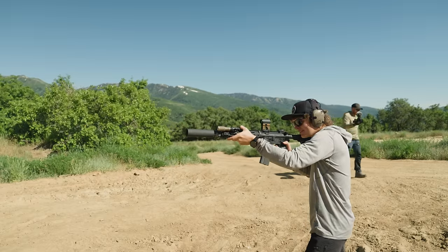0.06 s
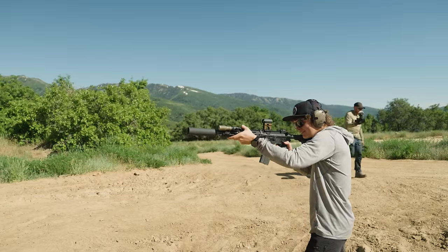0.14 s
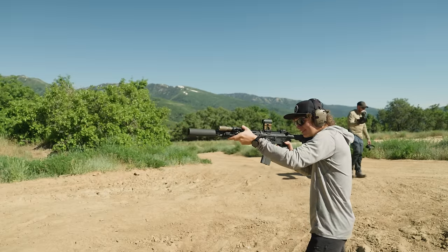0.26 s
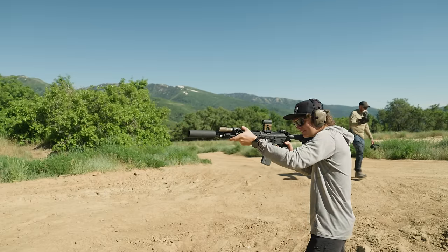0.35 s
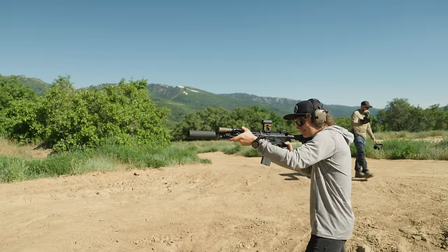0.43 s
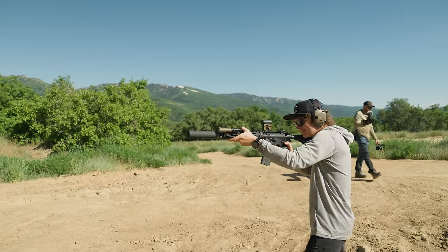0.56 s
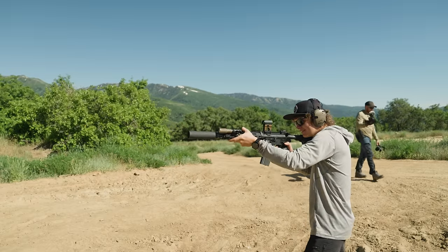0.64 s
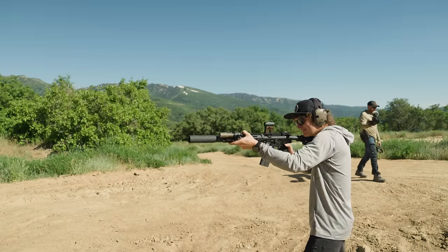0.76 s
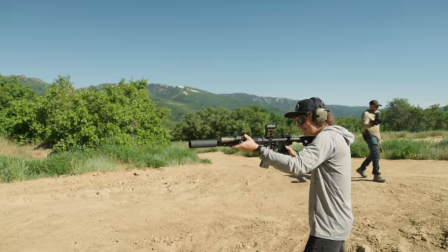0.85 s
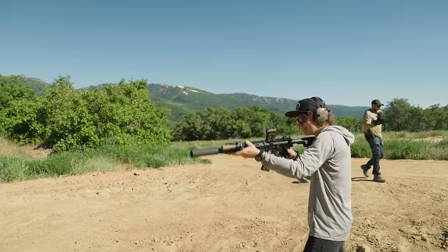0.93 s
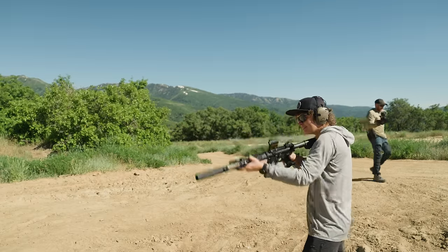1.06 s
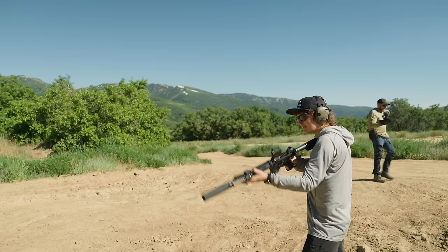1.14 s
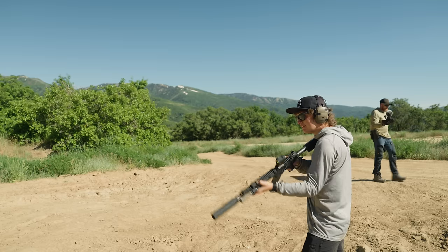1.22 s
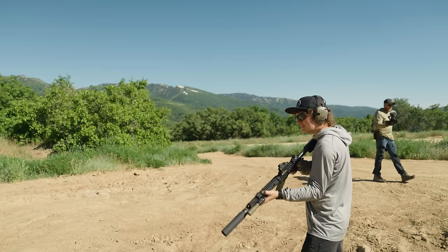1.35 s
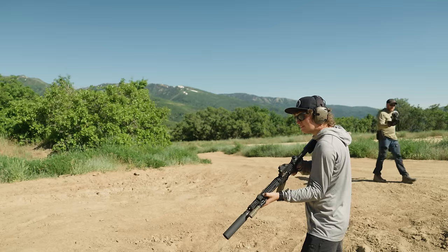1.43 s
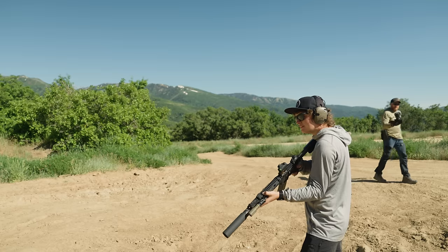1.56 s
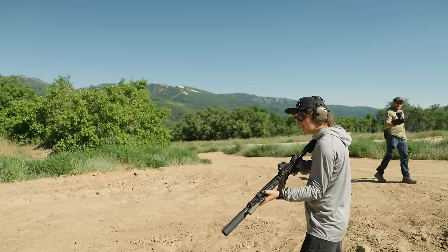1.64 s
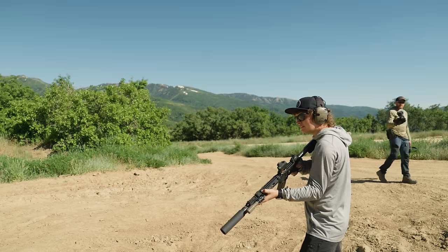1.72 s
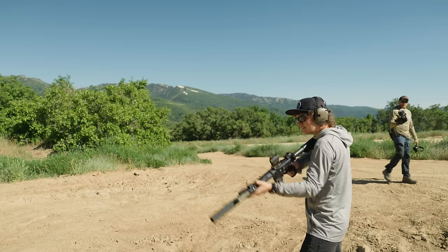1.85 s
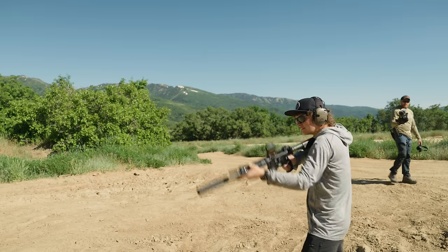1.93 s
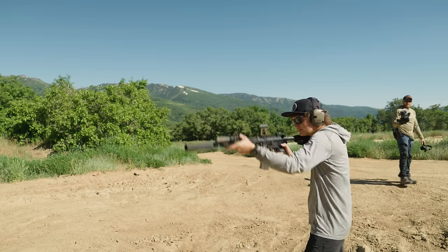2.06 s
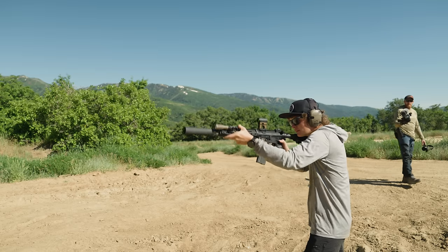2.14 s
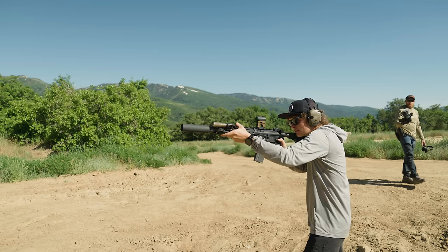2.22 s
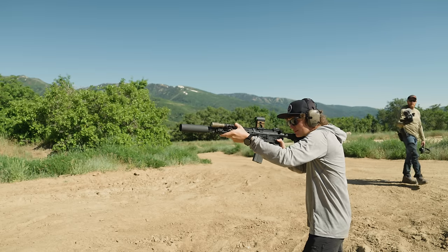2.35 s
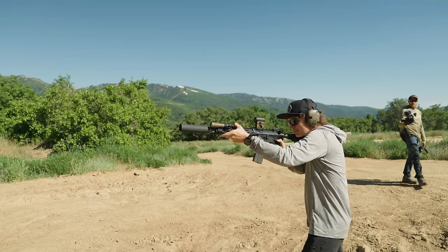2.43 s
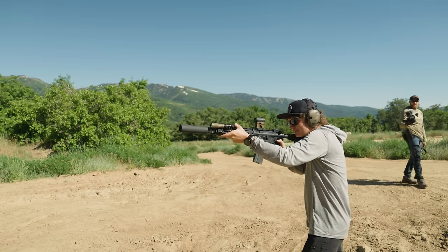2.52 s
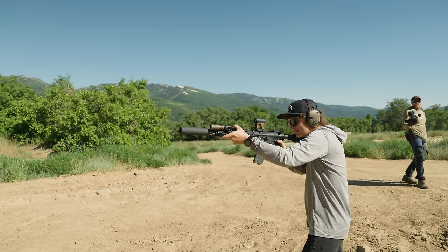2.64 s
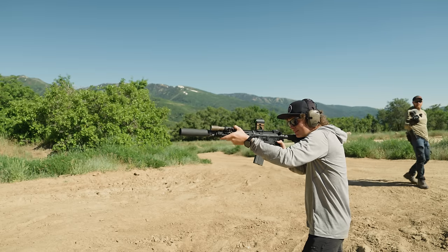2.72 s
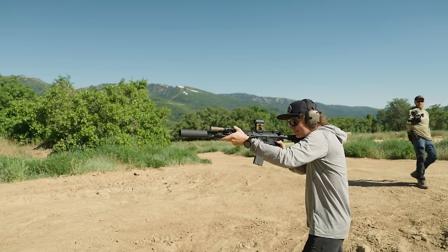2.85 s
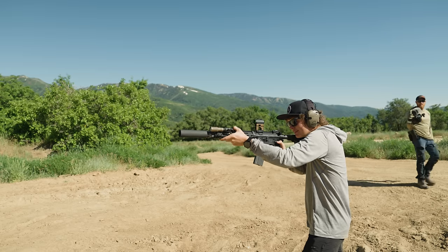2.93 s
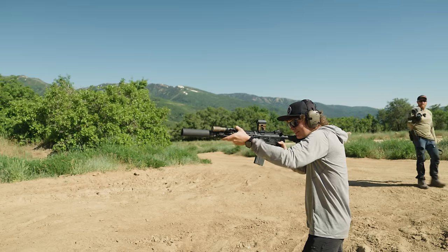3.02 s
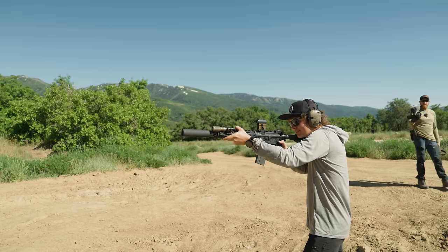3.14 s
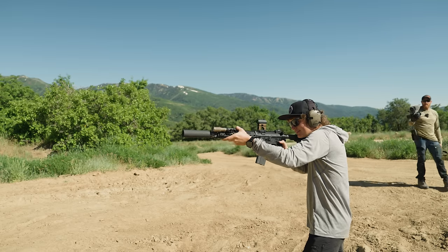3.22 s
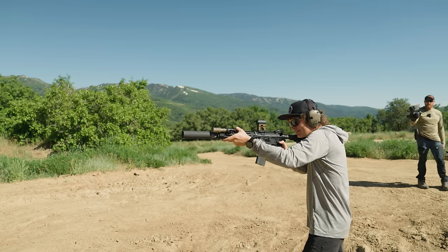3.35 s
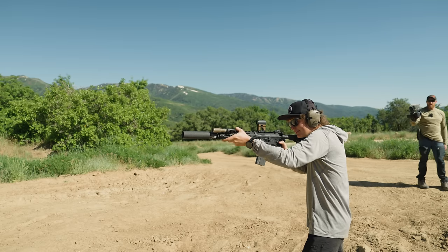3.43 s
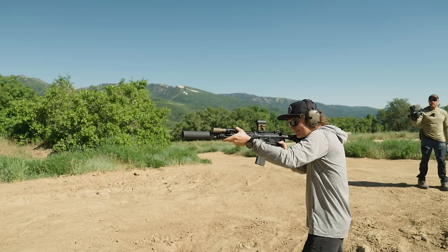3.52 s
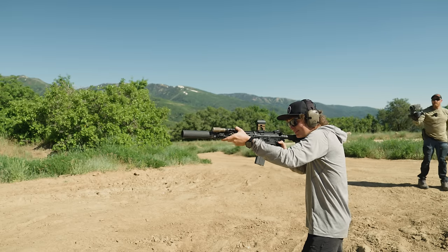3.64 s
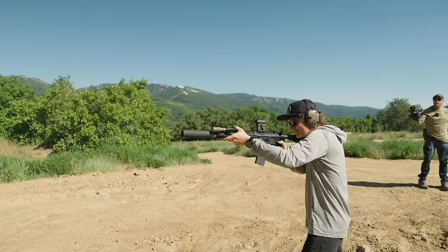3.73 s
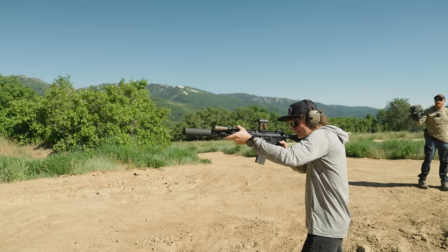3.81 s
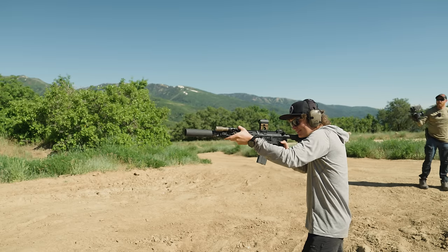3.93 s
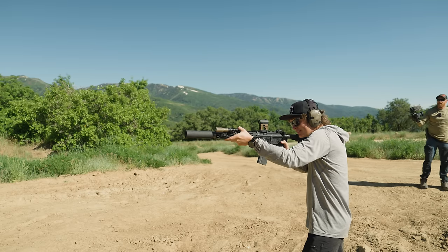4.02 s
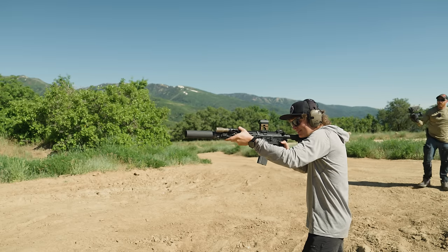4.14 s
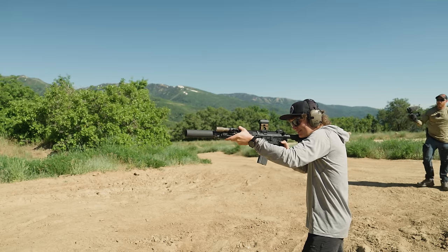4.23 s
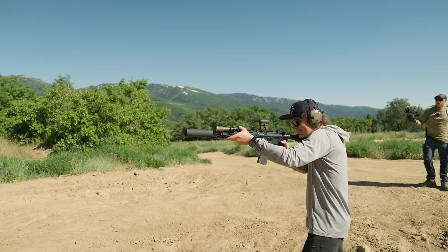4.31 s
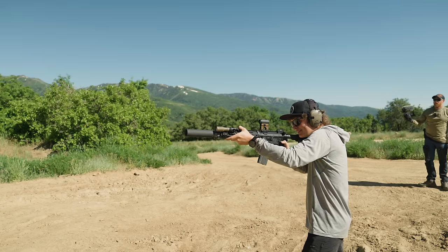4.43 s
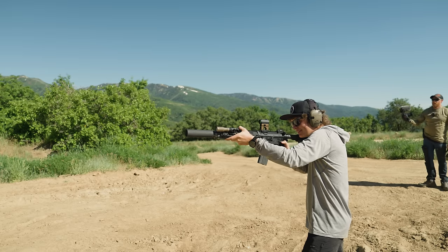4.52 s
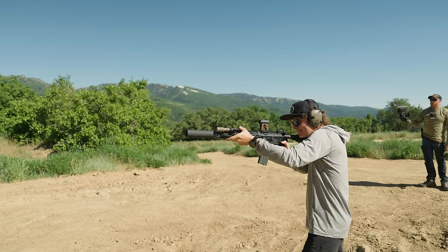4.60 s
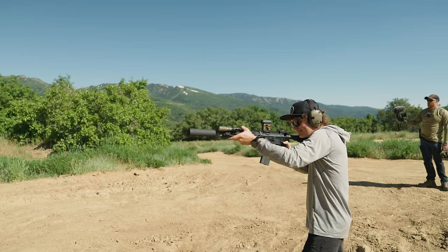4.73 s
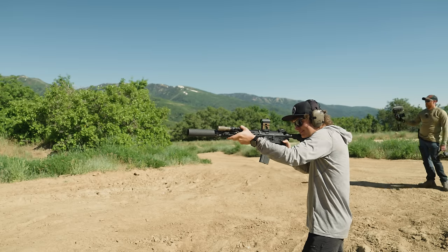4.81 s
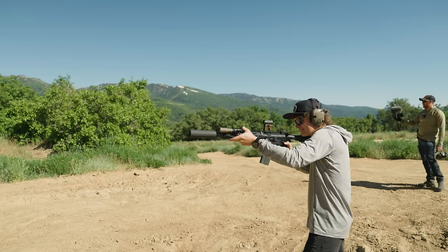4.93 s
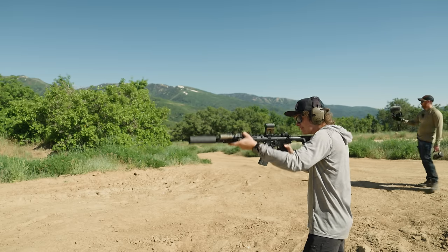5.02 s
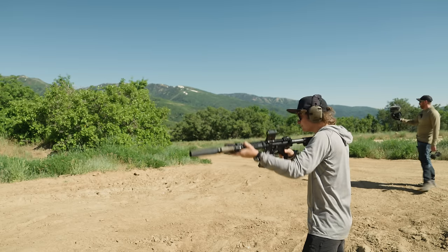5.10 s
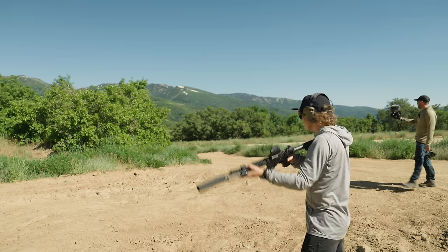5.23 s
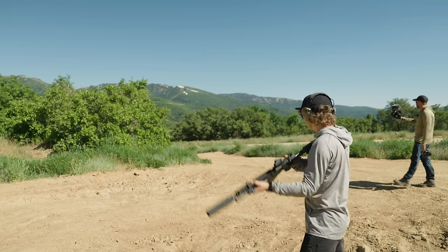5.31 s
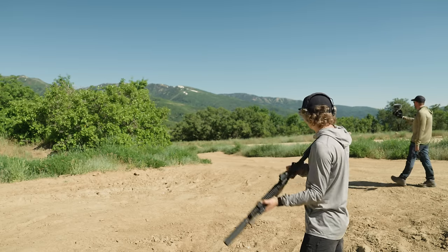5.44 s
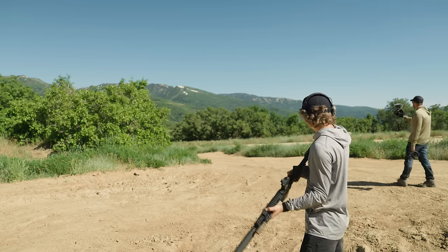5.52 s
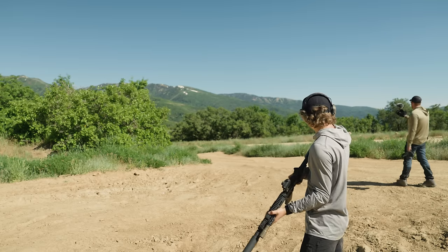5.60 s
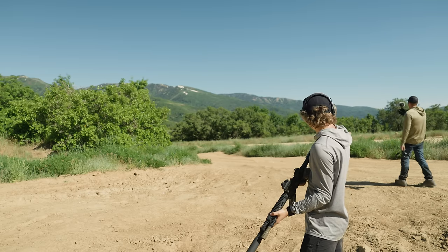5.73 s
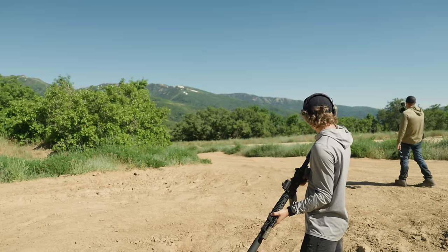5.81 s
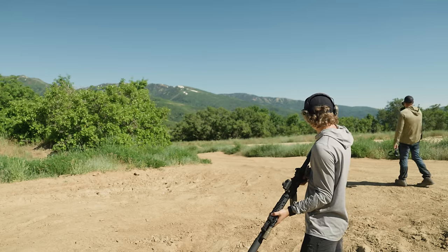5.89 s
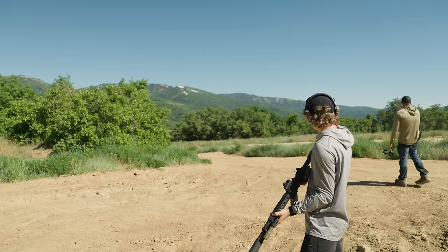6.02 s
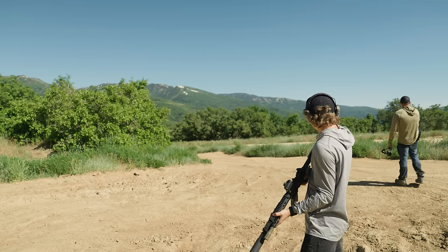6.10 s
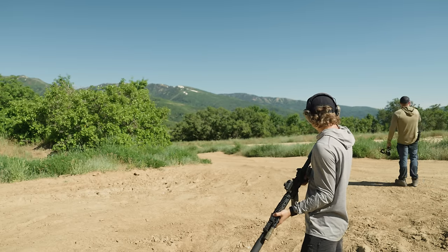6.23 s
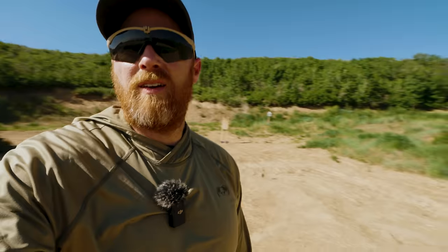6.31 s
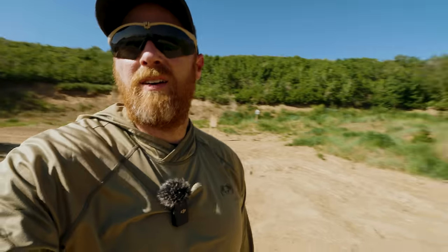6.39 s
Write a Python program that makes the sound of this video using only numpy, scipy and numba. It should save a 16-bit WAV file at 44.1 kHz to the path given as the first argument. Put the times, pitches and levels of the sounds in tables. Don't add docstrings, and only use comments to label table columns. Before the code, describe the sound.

Open dirt range, camera microphone a few metres from the shooter. One loud suppressed gunshot comes early, its action knocking back and home, its echo dulling into distant rumble. Quiet handling follows: buckles ticking, fabric rubbing, a boot scuff. Then three more shots at uneven gaps, each a deep clipped pop with bright gas spit and metallic clacks. Cases tinkle on the ground, then louder sling and stock rattles over faint breeze.

```python
import sys
import numpy as np
from scipy import signal
from scipy.fft import rfft, irfft
from scipy.io import wavfile
from scipy.ndimage import uniform_filter1d
from numba import njit

SR = 44100
rng = np.random.default_rng(int(sys.argv[2]) if len(sys.argv) > 2 else 0)


def dump_mix(stems):
    frames = np.atleast_2d(stems).T
    limited = np.clip(frames, -1, 1)
    pcm = np.round(limited * 32767).astype(np.int16)
    wavfile.write(sys.argv[1], SR, pcm)


def attenuation_scalar(level_db):
    decades = np.asarray(level_db, float) / 20
    return 10 ** decades


N = 284886
TIME = np.arange(N) / SR
TICKS = np.arange(0, N / SR, 1e-3)

# frequency in Hz, level in dB per Hz.
AIR_SPECTRUM = [(18, -41), (30, -9.5), (103, 4.5), (319, -8.5), (554, -3.5), (844, -5), (1320, -2.5),
                (3670, -10), (14800, -22), (16000, -25)]
ANCHOR_HZ = 650, 1600, 3800, 10500
# frequency in Hz, level in dB per third octave.
LAND_COLOUR = [(300, -43.5), (390, -11), (520, -1), (800, -3), (1200, -6.5), (1800, -7.5), (2600, -4.5),
               (3800, -4), (5500, -3.5), (8000, -3.5), (11000, -9), (15000, -17)]
# arrival in seconds after the shot, rise in seconds, hold in seconds,
# fall in dB/s, extra fall in dB/s per kHz.
REFLECTORS = [
    (.013, 0.0043, 0.063, 87.5, 10),
    (0.116, 0.05, .01, 261.5, 24.5),
    (0.144, 0.052, 0.025, 39, 17.5),
    (0.507, 0.016, .11, 33.5, 36),
]
REFLECTED = [
    (-33.7, -33.5, -27, -25),
    (-26, -21.5, -21, -35),
    (-32.5, -26, -29, -47.5),
    (-45, -42.5, -66, -98),
]
# shot time in seconds, then dB for bushes, tree line, field, slopes.
AIMS = [
    (-.497, -.1, -.1, -0.5, -1.5),
    (0.1745, 2.45, 3, 1.25, -1.5),
    (3.068, -1.6, -1.7, 0.14, -0.8),
    (3.8443, 0.8, -.6, 2.5, 1),
    (4.816, -0.65, -3.9, 2.24, -0.8),
]
# dB at 650 Hz, dB at 3800 Hz, dB at 10500 Hz.
AIM_COLOUR = [(-8.5, 3.5, 2.9), (-8.5, -3, -3.74), (-0.05, 4, -1), (-2, -1.6, 1.5), (-0.9, 0.2, 1.5)]
# arrival in seconds after the shot, rise in seconds, hold in seconds,
# fall in dB/s, level in dB.
BOOM = [
    (.001, 0.012, .11, 145, -38),
    (0.119, .045, .004, 420, -24.5),
    (0.201, .03, .01, 110.5, -50),
]
BOOM_SHOT_DB = [-.1, .1, .1, -0.13]
# frequency in Hz, level in dB.
BANK_HUMPS = [(68, -19), (92, -9), (134, -6), (189, -5), (270, -11), (370, -12)]
SWELL_S = [.73, 1.13, 2.12, 3.64, 4.025, 4.155, 4.75, 5.36, .75, .7, .05, .42, 4.72, 4.7, 4.7, 5.38, 3.65,
           5.14, 4.39, 3.44, 4.66, .78]
# half length in seconds, level in dB, frequency in Hz, width in octaves.
SWELLS = [(0.04, -58.5, 9300, 0.81), (.025, -61.5, 4100, 1), (0.01, -59.5, 8800, 0.12),
          (0.05, -57, 4960, 0.29), (0.049, -23.5, 5000, 0.19), (0.065, -24, 3020, 0.37),
          (0.049, -64, 9600, .7), (0.0236, -59, 7700, .9), (0.25, -51.5, 1112, 0.15),
          (0.24, -53, 500, 0.14), (0.06, -51.5, 450, .2), (0.081, -32.5, 1178, 0.22),
          (0.054, -49, 800, 0.82), (0.031, -48.5, 1066, 0.11), (0.048, -63, 2200, 0.65),
          (0.088, -47, 2600, 0.54), (0.037, -60, 2520, 0.11), (0.04, -42, 5600, 0.43),
          (0.041, -58, 4400, 0.42), (0.047, -38.5, 2800, 0.54), (0.069, -56.5, 330, 0.18),
          (0.11, -57.5, 2900, 1)]
# start in seconds, peak in dB, gas jet in dB, pop length in seconds, upper can mode in dB.
SHOTS = [
    (.1725, -.5, -7, .006, -3),
    (3.0667, -.5, -10, .006, 1),
    (3.8423, -.5, -7, .008, -5),
    (4.8147, -.5, -7, .0055, -6),
]
# frequency in Hz, width in Hz, level in dB.
CAN_MODES = [(326, 970, -2.5), (900, 450, -1.5), (1434, 730, 5), (2250, 660, -2.5), (3550, 720, 2.5)]
# time in seconds, peak in dB, centre in Hz, tick relative to peak in dB.
BOLT = [(0.1825, -2.5, 1396, 0), (0.2185, -5, 6480, -13), (0.2682, -1.5, 8060, -23.5),
        (0.3169, -8.5, 2840, -5.5), (3.0768, -2.5, 2430, 0), (3.105, -9, 3770, -6.5),
        (3.1138, -5.5, 3250, -5), (3.1643, -3, 5690, -3.5), (3.2217, -7, 806, -3), (3.8816, -5.5, 4090, 0),
        (3.8903, -3, 3936, 6.5), (3.9385, -11.5, 1190, -9.5), (3.9569, -7.5, 599.4, 3),
        (4.823, -2.5, 4934, -1), (4.8601, -4.5, 4640, -8.5), (4.8732, -3, 7165, -8),
        (4.9086, -7.5, 1423, 5), (4.9302, -10.5, 637, -0.5), (4.9682, -11, 747, -12.5)]
# start in seconds, frequency in Hz, level in dB, 60 dB decay in seconds.
PINGS = [(.424, 15000, -52, .25), (.473, 11700, -47, .07), (.473, 8400, -46, .04)]
# time in seconds, peak in dB, tick in Hz, low ring in dB, high ring in dB.
CASES = [(.4727, -26, 9000, -73, -66), (.8062, -20, 3000, -58, -59), (1.0388, -55, 2130, -75, -57),
         (3.6986, -38, 4500, -54, -54), (4.4958, -30, 2300, -45, -54), (5.3348, -30, 5000, -95, -95),
         (5.4617, -26, 4300, -45, -50)]
# frequency in Hz, 60 dB decay in seconds.
BRASS_MODES = [(10480, .17), (10550, .15), (14550, .08), (14950, .19)]
# time in seconds, peak in dB, body in Hz,
# tick relative to peak in dB, thud relative to peak in dB.
RATTLES = [(1.1098, -30.5, 2970, 5, -34), (1.3451, -25, 786, -22, -36), (5.6404, -33, 905, -26, -5),
           (6.2997, -20.5, 1465, -29.5, -3.5), (6.3277, -28.5, 1270, -27, -5)]
# time in seconds, peak in dB, body in Hz, tick relative to peak in dB.
CLIPS = [(1.3482, -26, 1910, -16), (1.3573, -28, 900, -19), (1.4391, -36.5, 5100, -15),
         (1.4945, -41.5, 1950, -10.5), (1.5779, -40.5, 635, -14), (1.6198, -31.5, 915, -11),
         (1.8968, -37, 1404, -20.5), (1.9979, -28.5, 2600, -32), (2.033, -37.5, 1420, -12),
         (2.058, -45, 1400, -17), (2.0867, -38.5, 1280, -15), (2.111, -37, 2970, 3),
         (2.1472, -42, 823, -12), (2.6224, -38, 697, -10), (2.185, -47.5, 2606, -6.5),
         (2.679, -45, 1300, -12), (5.6971, -38, 840, -15), (5.7506, -27.5, 804, -20),
         (5.9619, -28.5, 900, -18.5), (5.971, -27.5, 770, -34), (6.0253, -37.5, 2610, -13),
         (6.3692, -33.5, 1850, -33)]
# time in seconds, peak in dB, body in Hz,
# tick relative to peak in dB.
BUMPS = [(1.3758, -24, 728, -6), (1.3873, -42, 880, -20), (1.3946, -30, 620, -7.5),
         (1.4162, -45.5, 662, -17), (1.7795, -57.5, 567, -2), (2.1301, -47, 887, -5),
         (2.5939, -42, 617, -21), (3.7773, -37, 644, -28.5), (5.6524, -33.5, 770, -24.5),
         (5.6783, -34, 670, -31), (5.713, -33, 700, -16), (5.7208, -9, 896, -26), (5.7374, -26, 1310, -20),
         (5.7934, -28.5, 915, -26), (6.3076, -37, 320, -35), (6.3606, -31.5, 1466, -28),
         (6.386, -42, 418, -20)]
# time in seconds, peak in dB, frequency in Hz.
STEPS = [(1.385, -38, 125), (3.44, -37, 180), (4.39, -50, 190), (5.73, -46, 95), (6.31, -41, 130)]
# start in seconds, hold in seconds, level in dB,
# strap relative to cloth in dB, nylon relative to cloth in dB.
RUBS = [(1.334, 0.046, -48.5, -3.5, -10), (1.406, 0.24, -67, -10, -8), (1.75, 0.16, -67, 1.5, -3),
        (1.892, 0.1, -70.5, 6.5, -7), (1.986, 0.13, -61, 7, -5), (2.17, 0.053, -71.5, -2, -2),
        (2.41, 0.052, -72, 0, -12), (2.591, 0.021, -53.5, -0.5, -12), (2.661, 0.048, -67, -1, -14),
        (2.738, .16, -67, 8.5, 0), (2.923, 0.14, -70, 5, 2), (5.631, 0.13, -46, 0, -13.5),
        (5.785, 0.017, -48, -5, -26), (5.82, 0.22, -65, 1, -11), (5.95, 0.13, -50.5, 0.5, -12.5),
        (6.08, 0.097, -60, -1.5, -14), (6.285, 0.068, -48, -.8, -17.5), (6.38, .08, -65.5, -1, -18)]


@njit
def svf(x, hz, width):
    y, b, l = np.empty(len(x)), 0., 0.
    g, k = np.tan(np.pi * hz / SR), width / hz
    for i in range(len(x)):
        v = (b + g * (x[i] - l)) / (1 + g * (g + k))
        b, l, y[i] = 2 * v - b, l + 2 * g * v, k * v
    return y


def resonate(x, hz, width):
    return svf(svf(x, hz, width), hz, 2 * width)


def unit(x):
    return x / np.sqrt(np.mean(x ** 2))


def hiss(hz, octaves):
    f = np.fft.rfftfreq(N, 1 / SR) + 1
    bell = np.exp(-(np.log2(f / hz) / octaves) ** 2)
    return unit(irfft(rfft(rng.standard_normal(N)) * bell, N))


def walk(rate):
    k = int(SR / rate)
    held = np.repeat(rng.standard_normal(N // k + 1), k)
    return unit(uniform_filter1d(held, k)[:N])


def colour(table, hz):
    table_hz, table_db = np.transpose(table)
    return np.interp(np.log(hz), np.log(table_hz), table_db)


def swell(start, rise, hold, fall):
    t = TICKS - start
    climb = 21.5 * np.minimum(t / rise - 1, 0)
    return np.where(t < 0, -200, np.minimum(climb, fall * (rise + hold - t)))


def summed(dbs):
    return np.interp(TIME, TICKS, np.sqrt(sum(attenuation_scalar(db) ** 2 for db in dbs)))


def add(out, s, x, db, at_peak=False):
    i = int(s * SR) - at_peak * np.argmax(np.abs(x))
    out[i:i + len(x)] += (x * attenuation_scalar(db) / np.abs(x).max())[:N - i]


def knock(hz, t60, tick_db, thud_db, width=.55, tick_hz=3500.):
    t = np.arange(4000) / SR
    grit = rng.standard_normal(len(t)) * np.minimum(t * hz, 1)
    push = grit * 1000. ** (-t / max(0.81 * t60, .003))
    push[int(SR / hz)] += 3
    out = 0
    for db, f, w in ((0, 1. * hz, width * hz), (tick_db, tick_hz, 2.5 * tick_hz), (thud_db, 300., 220.)):
        part = svf(resonate(push, f, w), f, 2 * w)
        out = out + attenuation_scalar(db) * part / np.abs(part).max()
    return out


def air():
    out = 0
    for hz in 40 * 2 ** np.arange(0, 9, .5):
        db = colour(AIR_SPECTRUM, hz) + 10 * np.log10(hz)
        out = out + attenuation_scalar(db + 0.92 * walk(6)) * hiss(hz, 0.33)
    return unit(out) * attenuation_scalar(-67)


def echo_levels(hz):
    curves = []
    beyond = max(hz / ANCHOR_HZ[3] - 1, 0) * .8
    for (s, *aim_dbs), (low_db, high_db, top_db) in zip(AIMS, AIM_COLOUR):
        aim_colour_db = np.interp(hz, ANCHOR_HZ, (low_db, 0, high_db, top_db))
        for (late, rise, hold, fall, more), back, aim_db in zip(REFLECTORS, REFLECTED, aim_dbs):
            back_db = np.interp(hz, ANCHOR_HZ, back) + beyond * min(back[3] - back[2] + 3, 0)
            curve = swell(s + late, rise, hold, fall + more * hz / 1000)
            curves.append(curve + aim_db + back_db + aim_colour_db)
    return curves


def scatter():
    out, shared = 0, walk(70)
    for hz in 280 * 2 ** np.arange(0, 6, 1 / 3):
        patchy_db = colour(LAND_COLOUR, hz) + 1.1 * shared + 1.5 * walk(35)
        out = out + summed(echo_levels(hz)) * attenuation_scalar(patchy_db) * hiss(hz, 0.25)
    return out


def bass_boom():
    curves = []
    for (s, *_), shot_db in zip(SHOTS, BOOM_SHOT_DB):
        for late, rise, hold, fall, db in BOOM:
            curves.append(swell(s + late, rise, hold, fall) + db + shot_db)
    boom = summed(curves)
    return sum(boom * attenuation_scalar(db + 0.43 * walk(33)) * hiss(hz, 0.26) for hz, db in BANK_HUMPS)


def swishes():
    out = 0
    for s, (half, db, hz, octaves) in zip(SWELL_S, SWELLS):
        out = out + attenuation_scalar(db) * np.exp(-((TIME - s) / half) ** 2) * hiss(hz, octaves)
    return out


def can_pop(pop_s, upper_db):
    chance, slams = rng.standard_normal((16, 2)), np.zeros(3000)
    when = .0009 * np.cumsum(np.exp(.4 * chance[:, 0]))
    when -= when[0]
    slams[(when * SR).astype(int) + 40] = -attenuation_scalar(3 * chance[:, 1]) / (1 + (when / pop_s) ** 4)
    slams[[8, 40]] = -.08, -1.5
    modes = [attenuation_scalar(db) * resonate(slams, 1. * hz, 1. * width) / width for hz, width, db in CAN_MODES]
    pop = sum(modes[:-1]) + attenuation_scalar(upper_db) * modes[-1]
    return np.tanh(1.5 * pop / np.abs(pop).max())


def gas_jet():
    t = np.arange(3000) / SR
    late = (t - 0.0073) / 0.011
    noise = svf(rng.standard_normal(len(t)), 9500., 14000.)
    return noise * (np.clip(late * 8, 0, 1) + 0.087) / (1 + late ** 6)


def rifle():
    out = np.zeros(N)
    for s, db, jet_db, pop_s, upper_db in SHOTS:
        add(out, s - .0011, can_pop(pop_s, upper_db), db)
        add(out, s, gas_jet(), jet_db + .1)
    for s, db, hz, tick_db in BOLT:
        clack = knock(hz, 0.021, tick_db - 1.5, -26.5, width=.8, tick_hz=8040.)
        add(out, s, clack, db - 3, at_peak=True)
    return out


def brass_ring(hz, t60):
    t = np.arange(12000) / SR
    return np.sin(2 * np.pi * hz * t) * 1000. ** (-t / t60)


def cases():
    out = np.zeros(N)
    for s, db, hz, low_db, high_db in CASES:
        add(out, s, knock(hz, .012, -7, -40, width=.8, tick_hz=8000.), db, at_peak=True)
        detune = 1 + 0.0026 * rng.standard_normal(4)
        rings = [brass_ring(mode_hz * k, t60) for (mode_hz, t60), k in zip(BRASS_MODES, detune)]
        add(out, s, rings[0] + 0.61 * rings[1], low_db)
        add(out, s, .6 * rings[2] + rings[3], high_db)
    for s, hz, db, t60 in PINGS:
        add(out, s, brass_ring(hz, t60), db)
    return out * attenuation_scalar(1.2 * walk(60))


def gear_knocks():
    out = np.zeros(N)
    # thud in dB (rattles have theirs), decay in seconds, tick in Hz
    knocks = [(*row, 0.048, 3000.) for row in RATTLES]
    knocks += [(*row, -29, 0.0158, 3500.) for row in CLIPS]
    knocks += [(*row, -13, 0.018, 2300.) for row in BUMPS]
    for s, db, hz, tick_db, thud_db, t60, tick_hz in knocks:
        hit = knock(hz, t60, tick_db, thud_db, tick_hz=max(tick_hz, 1.3 * hz))
        add(out, s, hit, db, at_peak=True)
    for s, db, hz in STEPS:
        add(out, s, knock(hz, 0.055, -60, -60), db, at_peak=True)
    return out


def cloth_rubs():
    rubs = [swell(s, 0.0061, hold, 422.5) + db for s, hold, db, *_ in RUBS]
    strap = summed(rub + row[3] for rub, row in zip(rubs, RUBS))
    nylon = summed(rub + row[4] for rub, row in zip(rubs, RUBS))
    friction = summed(rubs) * (hiss(650, .6) + attenuation_scalar(-10) * hiss(250, .8))
    friction = friction + strap * hiss(1450, .5) + nylon * attenuation_scalar(1) * hiss(3000, .65)
    return attenuation_scalar(3.14 * walk(250) - 2) * friction


def scene():
    land = scatter() + bass_boom() + swishes()
    gear = gear_knocks() + cloth_rubs()
    return (air() + land + rifle() + cases() + gear)[None]


def top_cut(x):
    return signal.sosfilt(signal.butter(12, 16850, fs=SR, output="sos"), x)


def record(dry):
    band = signal.sosfilt(signal.butter(4, 56, "high", fs=SR, output="sos"), dry)
    band = signal.sosfilt(signal.ellip(6, .3, 50, 15700, fs=SR, output="sos"), band)
    rounded = np.tanh(.6 * band) / .55
    return top_cut(rounded)


dry = scene()
out = record(dry)
dump_mix(out)
```